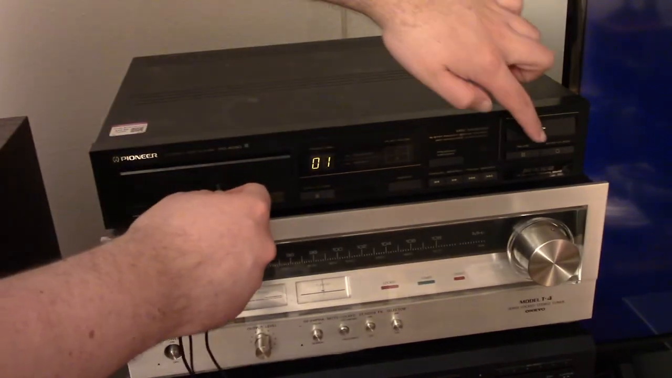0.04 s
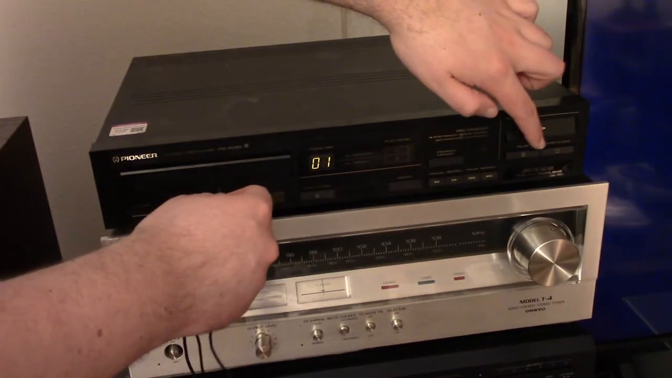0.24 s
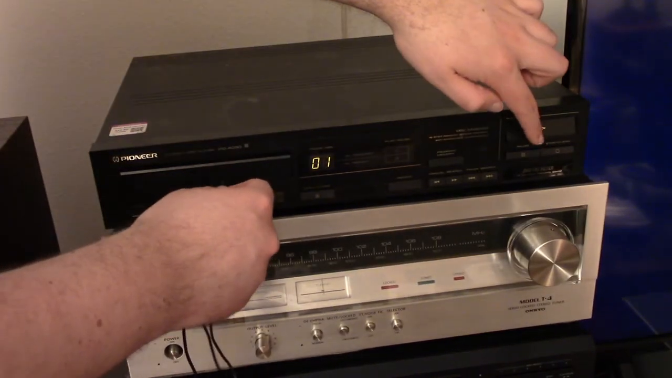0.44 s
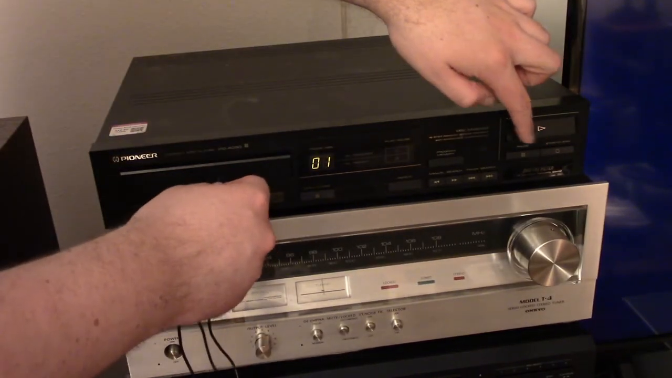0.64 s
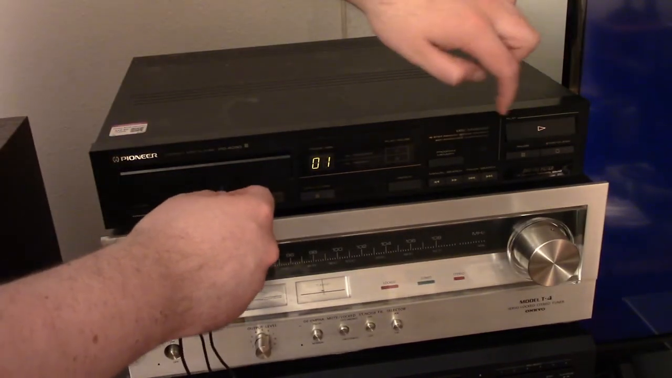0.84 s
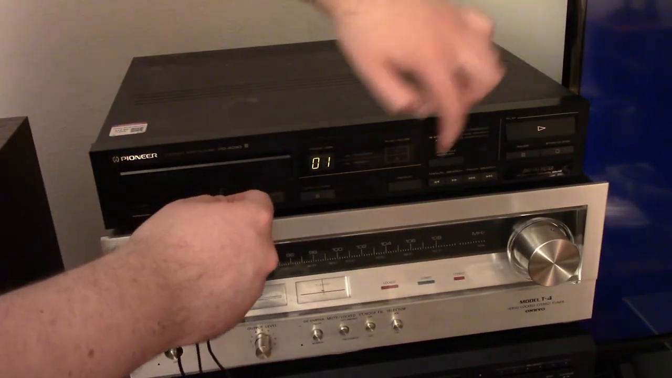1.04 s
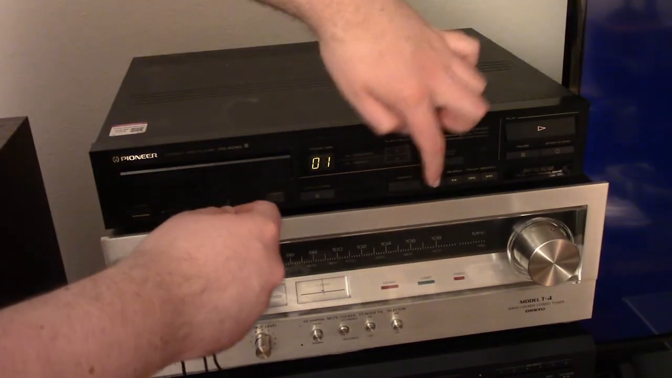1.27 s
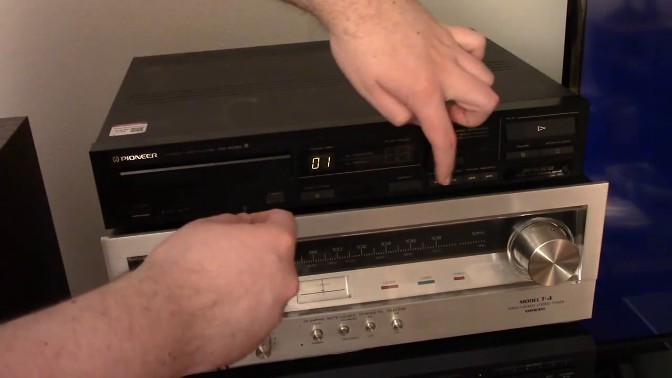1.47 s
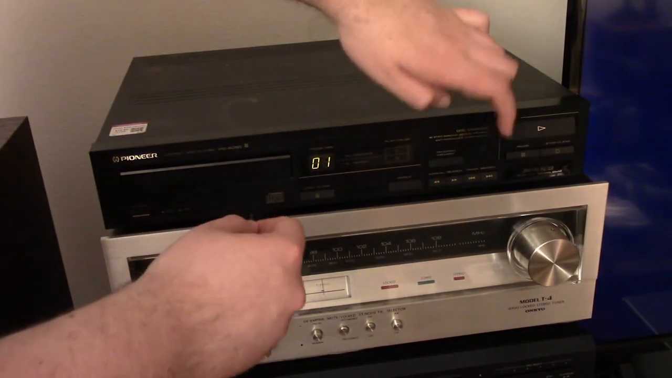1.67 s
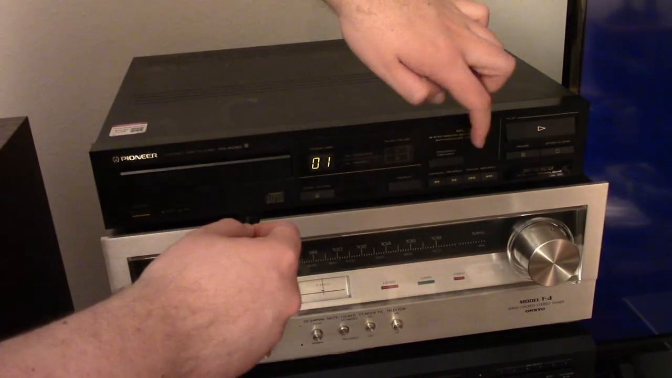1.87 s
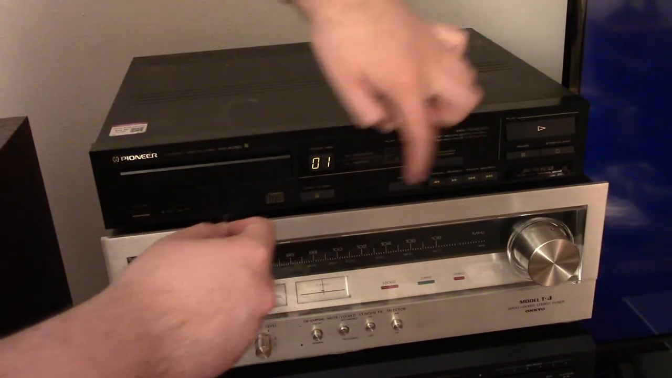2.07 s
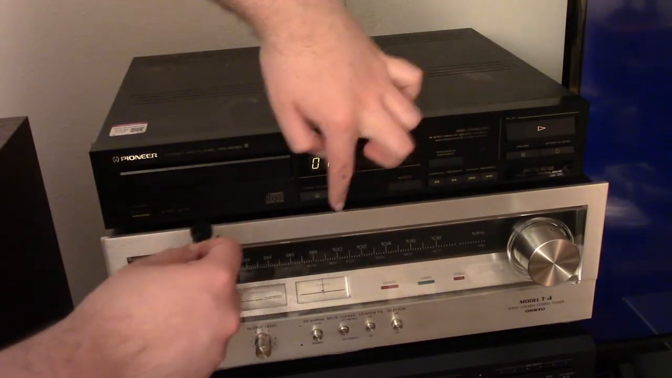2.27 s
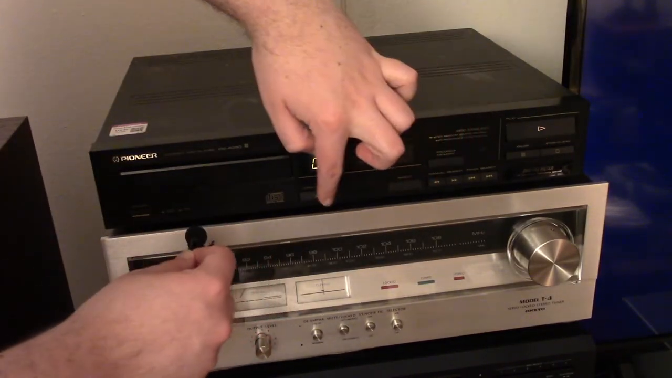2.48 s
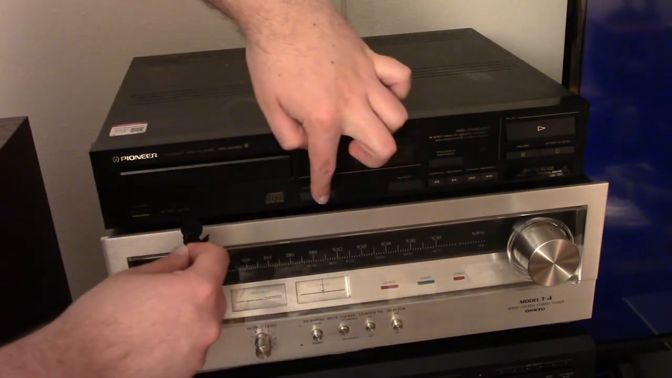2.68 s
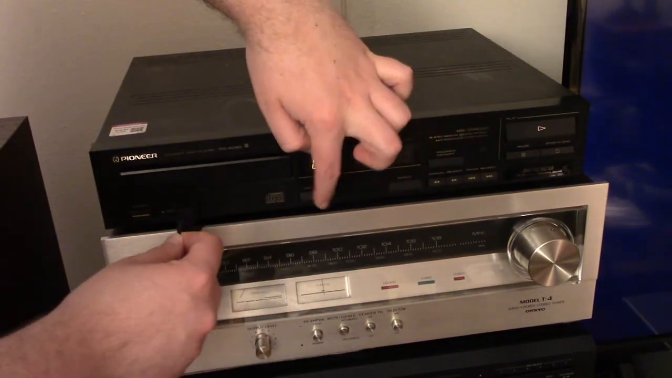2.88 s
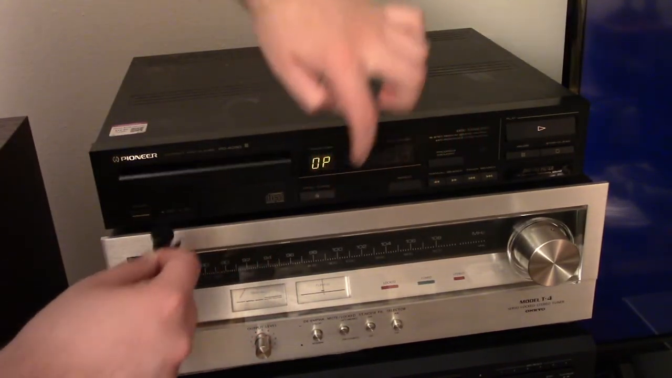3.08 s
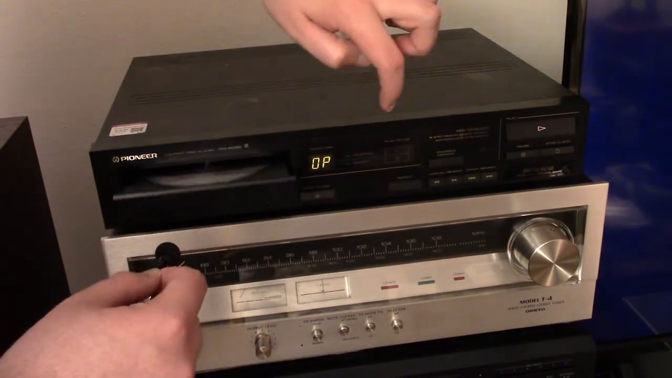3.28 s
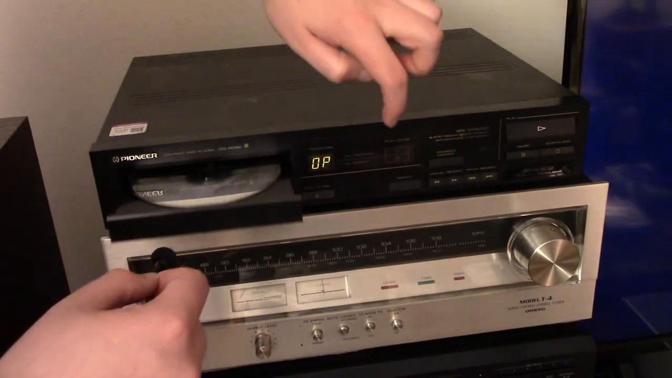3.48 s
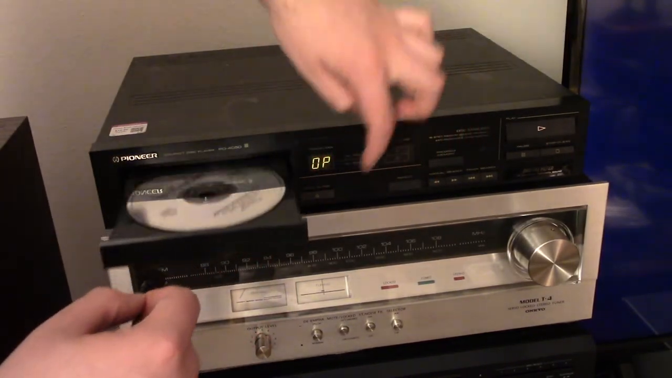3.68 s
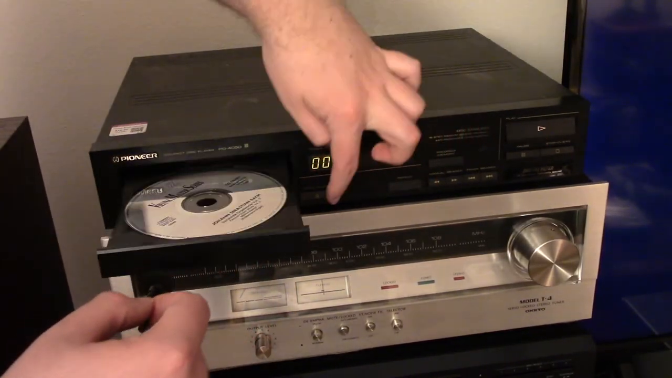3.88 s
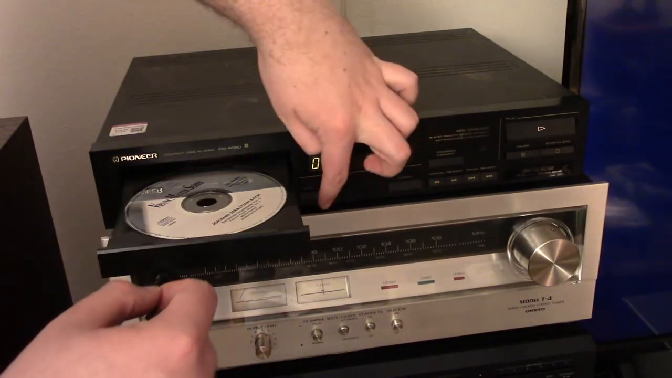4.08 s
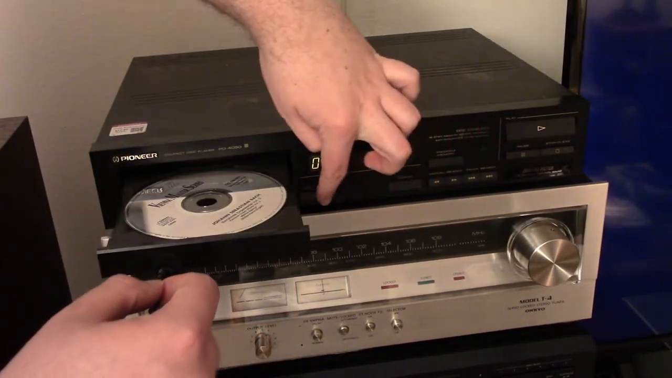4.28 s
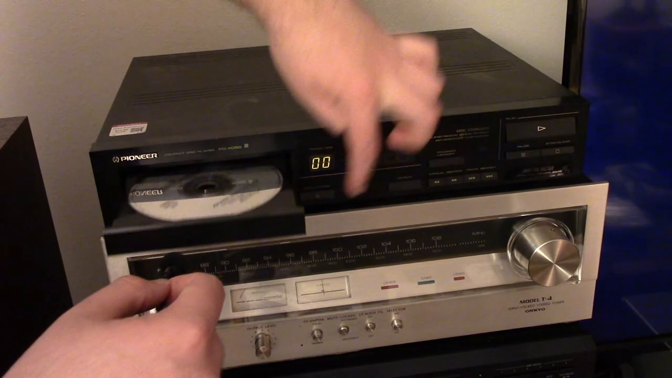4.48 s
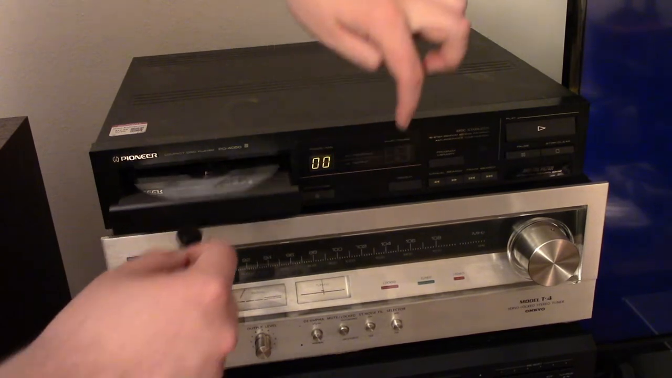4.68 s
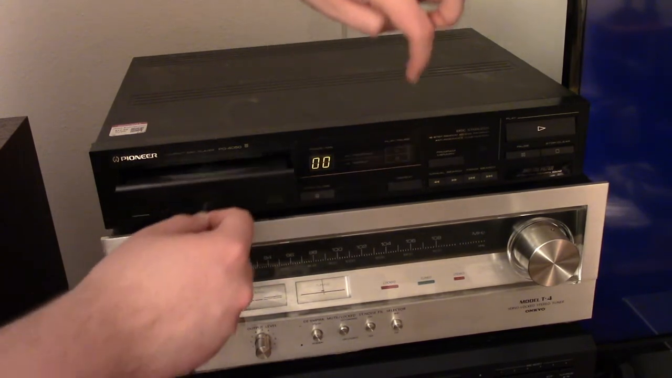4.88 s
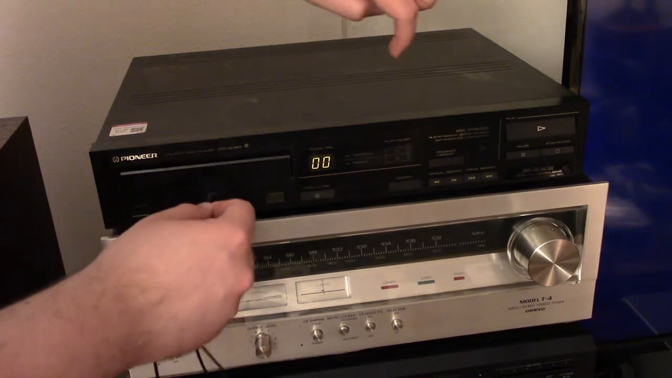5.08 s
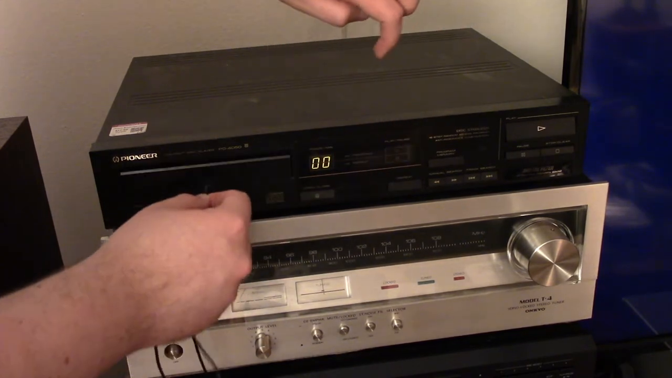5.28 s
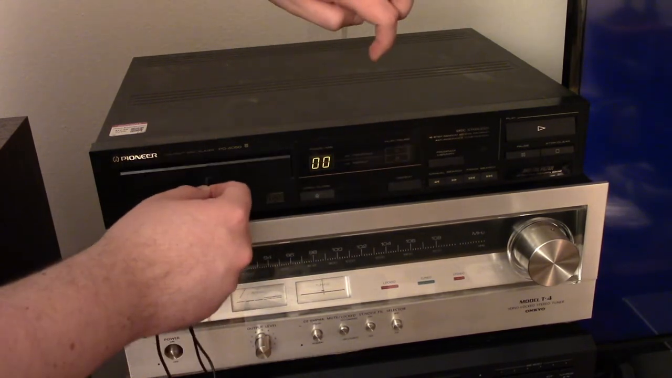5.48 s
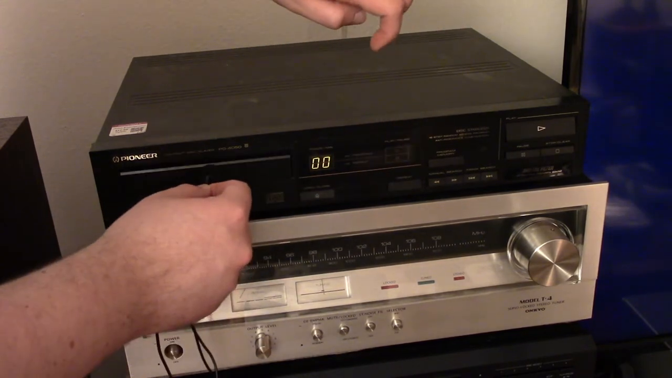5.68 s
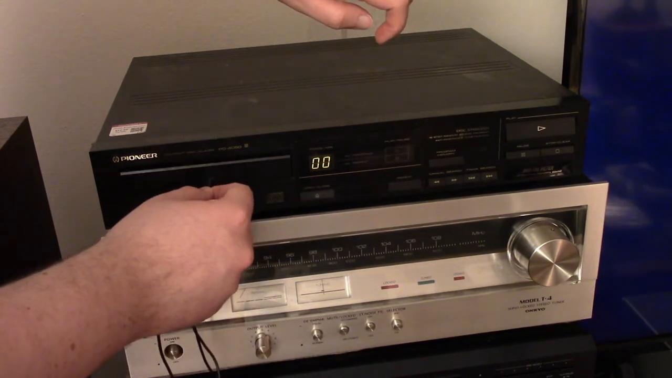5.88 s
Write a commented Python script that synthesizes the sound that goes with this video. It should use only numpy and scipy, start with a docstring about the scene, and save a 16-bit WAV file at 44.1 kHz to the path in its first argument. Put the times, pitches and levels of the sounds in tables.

```python
"""A disc player's tray slides out and back in, heard by a small hand-held microphone near its front panel.
At first the disc spindle murmurs until it halts, while bumps and rubs of the hand reach the microphone.
Then clicks, short pings and dense gear and rail noise carry the tray out under a motor hum, and it stops.
The motor pulls it back until it seats with heavy thuds and the clamp closes; clicks ring the hollow case.
The hand's deep rumble and a quiet room, both shaped noise, lie under everything."""
import sys
import numpy as np
from scipy import signal
from scipy.fft import rfft, irfft, next_fast_len
from scipy.io import wavfile

SR = 44100
rng = np.random.default_rng(int(sys.argv[2]) if len(sys.argv) > 2 else 0)


def generate_wav(signal):
    """Clip the signal to [-1, 1] and save it as 16-bit WAV at the path in sys.argv[1]."""
    frames = np.transpose(np.atleast_2d(signal))
    scaled = np.clip(frames, -1, 1) * 32767
    pcm = np.round(scaled).astype(np.int16)
    wavfile.write(sys.argv[1], SR, pcm)


def rack_gain(trim_db):
    """Turn a fader trim in dB into the linear factor to multiply a signal by."""
    fader = np.asarray(trim_db, float)
    return 10 ** (fader / 20)


N = 261733   # length in samples


def rms_one(x):
    """Scale to unit rms."""
    return x / np.sqrt(np.mean(x ** 2) + 1e-20)


def in_time(tables, fade_s=0.0046):
    """Columns of each table as curves, after a gate that is open only inside the tables."""
    t = np.arange(N) / SR
    s, *columns = np.transpose(np.concatenate(tables))
    gate = np.zeros(N)
    for rows in tables:
        to_nearest_end = np.minimum(t - rows[0][0], rows[-1][0] - t)
        gate += np.clip(to_nearest_end / fade_s, 0, 1)
    return [gate] + [np.interp(t, s, column) for column in columns]


def drift(rate_hz):
    """Slow random wandering of spread 1: noise smoothed twice, made at every 40th sample."""
    r = np.exp(-2 * np.pi * rate_hz * 40 / SR)
    noise = rng.standard_normal(N // 40 + 2002)
    slow = signal.lfilter([1], [1, -2 * r, r * r], noise)[2000:]   # drop the filter's start-up
    return np.interp(np.arange(N) / 40, np.arange(len(slow)), rms_one(slow))


def band(x, low_hz, high_hz):
    """Butterworth band-pass."""
    edges_hz = [low_hz, min(high_hz, 0.45 * SR)]
    return signal.sosfilt(signal.butter(2, edges_hz, "band", fs=SR, output="sos"), x)


def coloured(spectrum, source):
    """A flat source shaped by a spectrum; rms 1."""
    hz, db = np.transpose(spectrum)
    size = next_fast_len(N)
    grid_hz = np.maximum(np.arange(size // 2 + 1) * SR / size, 1)
    shape = rack_gain(np.interp(np.log(grid_hz), np.log(hz), db)) * (grid_hz > hz[0] / 2)
    return rms_one(irfft(rfft(source, size) * shape, size)[:N])


def ring(clicks, hz, t60):
    """Each unit click sets off a sine of height 1 that falls 60 dB in t60 seconds."""
    r, w = rack_gain(-60 / (t60 * SR)), 2 * np.pi * hz / SR
    return signal.lfilter([0, np.sin(w)], [1, -2 * r * np.cos(w), r * r], clicks + 1e-18)


def modes(table, drive):
    """One drive sets a table of resonances ringing, signs alternating."""
    return sum((-1) ** k * rack_gain(db) * ring(drive, hz, t60) for k, (hz, db, t60) in enumerate(table))


def grit(per_s, spread_db):
    """Random clicks of uneven size and sign."""
    sizes = rack_gain(spread_db * np.minimum(rng.exponential(1, N), 5)) * rng.choice([-1, 1], N)
    return sizes * (rng.random(N) < per_s / SR)


def pings(rows):
    """Lone decaying tones from rows of start_s, level_db, pitch_hz, t60_s."""
    out, t = np.zeros(N + SR), np.arange(SR // 4) / SR
    for s, db, hz, t60 in rows:
        at = round(s * SR)
        out[at:at + len(t)] += rack_gain(db - 60 * t / t60) * np.sin(2 * np.pi * hz * t)
    return out[:N]


# Tones of the motor hum: multiple of the shaft speed, level_db against the hum
MOTOR_TONES = [(1, -7.5), (2, -2.5), (3, -3.5), (5, -11), (7, -18.5)]
# Times the motor is heard: start_s, stop_s, start_level_db, stop_level_db
MOTOR_RUNS = [(3.017, 3.585, -46, -50), (4.428, 5.01, -56.5, -42.5)]


def motor(shaft_hz=116.8, waver=0.0077, flutter_db=4.0):
    """A few low multiples of a wavering shaft speed, each wandering in level."""
    runs = [[(start, first_db), (stop, last_db)] for start, stop, first_db, last_db in MOTOR_RUNS]
    gate, hum_db = in_time(runs, fade_s=0.056)
    turn = 2 * np.pi * np.cumsum(shaft_hz * (1 + waver * drift(6.3))) / SR
    hum = sum(rack_gain(hum_db + db + flutter_db * drift(20)) * np.sin(k * turn) for k, db in MOTOR_TONES)
    return gate * np.sqrt(2) * hum


# Noise of the moving tray, one list per run: time_s, case_rumble_db, rail_hiss_db (both before a fixed trim)
TRAVEL = [
    [(2.626, -37, -63), (2.696, -44, -60), (2.8, -34, -52), (2.92, -33, -39.5), (3.112, -45.5, -46),
     (3.3, -45, -50.5), (3.614, -40, -46.5), (3.75, -65, -52.5), (3.87, -70, -66.5)],
    [(4.198, -63, -80), (4.27, -45, -53.5), (4.382, -43, -47.5), (4.806, -37, -47), (5.118, -39, -39),
     (5.168, -36, -47), (5.246, -30.5, -44.5), (5.34, -53.5, -87), (5.5, -82, -85)],
]
# Tone colour of the rail hiss: pitch_hz, level_db per Hz
RAIL_COLOUR = [(590, -13), (1000, 3.5), (1280, -7), (1550, -4.5), (2740, 4.5), (3620, -6), (4020, -3.5),
               (5900, -7.5), (6940, -12.5), (8260, -13.5), (16000, -30)]
# What the case and tray ring with, also used by thump(): pitch_hz, level_db, t60_s
CASE_MODES = [(53.7, -16, 0.23), (91, -7, 0.088), (143, -5.5, 0.089), (187.4, -1.5, 0.084),
              (222, 1.5, 0.05), (275.4, 2, 0.11), (347, 1, 0.05), (396, 4, 0.022), (570, 0.5, 0.061),
              (643.3, -3.5, 0.098), (698, -5.5, 0.061), (809.4, -0.5, 0.052), (947, -6, 0.054),
              (1080, -6, 0.024), (1250, 0.5, 0.032), (1510, -7, 0.013), (1480, -14.5, 0.068),
              (1655, -8.5, 0.053), (1904, -23, 0.06), (2215, -14.5, 0.063), (2650, -19, 0.015)]


def travel(patch_db=2.0, flutter_db=0.6, start_tilt_db=-1.5, tilt_growth_db_per_s=3.5):
    """Gear teeth and rail grit: dense small clicks that shake the case modes and hiss along the rails."""
    gate, rumble_db, hiss_db = in_time(TRAVEL)
    # the hiss brightens as the tray gathers way; tilt in dB per octave
    clocks = [[(rows[0][0], 0), (rows[-1][0], rows[-1][0] - rows[0][0])] for rows in TRAVEL]
    _, seconds_into_run = in_time(clocks)
    tilt_db = start_tilt_db + tilt_growth_db_per_s * seconds_into_run

    # the sliding tray feeds each mode unevenly; the two lowest are left out
    shaking, rumble = grit(2500, 3.24), np.zeros(N)
    for k, mode in enumerate(CASE_MODES[2:]):
        rumble += (-1) ** k * modes([mode], shaking) * rack_gain(3.8 * drift(9.8))

    # every half octave swells and sinks by itself as the contacts move along the rails
    rails, hiss = coloured(RAIL_COLOUR, grit(6000, 3.0)), np.zeros(N)
    edges_hz = np.geomspace(500, 16000, 11)
    for k, (low, high) in enumerate(zip(edges_hz, edges_hz[1:])):
        swell_db = patch_db * drift(41) + tilt_db * np.log2(low / edges_hz[5])
        hiss += (-1) ** k * band(rails, low, high) * rack_gain(swell_db)   # alternate signs let neighbours add

    rumble = rack_gain(rumble_db - 4.5) * rms_one(rumble)
    hiss = rack_gain(hiss_db - 4.44 + flutter_db * drift(44)) * rms_one(hiss)
    return gate * (rumble + hiss)


def burst(t60, hz, width_hz):
    """A struck part's ping: dying noise sent twice through one resonance, peak 1."""
    t, r = np.arange(SR // 8) / SR, np.exp(-np.pi * width_hz / SR)
    section = [1, 0, -1, 1, -2 * r * np.cos(2 * np.pi * hz / SR), r * r]
    tone = signal.sosfilt([section, section], rng.standard_normal(len(t)) * rack_gain(-60 * t / t60))
    return tone / np.abs(tone).max()


def thump(t, spread_db, swell_s, slope_db):
    """Every case mode with its own random strength and phase, swelling over the contact; rms 1 at first."""
    hz, db, t60 = np.transpose(CASE_MODES)[:, :, None]
    luck, start = rng.standard_normal((len(CASE_MODES), 1)), rng.random((len(CASE_MODES), 1))
    level_db = db + slope_db * np.log2(hz / 500) + spread_db * luck - 60 * t / t60
    rings = rack_gain(level_db) * np.sin(2 * np.pi * (hz * t + start))
    body = np.sum(rings, axis=0) * (1 - np.exp(-(t / swell_s) ** 2))
    return body / np.sqrt(np.mean(body[:SR // 50] ** 2))   # rms over the first 20 ms


# Hard clicks of button, latches and gears: start_s, level_db of the whole click,
# sparkle_db against that level, ping_hz, ping_db against that level
CLICKS = [(2.236, -44.5, 7, 4020, -16), (2.339, -45, 1, 4000, -10), (2.351, -44, 3, 3980, -9),
          (2.626, -26.5, -29, 2430, -5), (2.647, -42.5, 6, 2070, -21), (2.6986, -36.5, -2, 3160, -7),
          (2.706, -22.5, 7, 5600, -21), (2.7145, -25, -12, 2020, -7), (2.766, -21.5, -8, 4600, -11),
          (2.808, -25, 6.5, 3340, -27), (2.828, -36, 3, 3280, -4), (2.8482, -26, 0, 2100, -22),
          (2.8759, -26, -11, 3540, 0), (2.8853, -35, 16.5, 4830, 4.5), (2.9006, -33, -8, 3680, 6),
          (2.917, -41, 2, 6030, 3), (2.9271, -26, 10.5, 2790, 0), (2.95, -29, 8, 2700, -3),
          (2.9594, -22.5, -7, 3920, -6.5), (2.9825, -22.5, -19, 2530, -11), (3.011, -26, -6, 2495, -16),
          (3.13, -34, -21, 2470, -6), (3.1474, -42, -27, 3700, 2), (3.3054, -43.5, -25, 2020, 2),
          (3.5979, -29.5, -22, 2320, -0.5), (3.6187, -36, -15, 2640, -16), (3.6707, -33, -21, 2740, -16),
          (3.6986, -22, -15, 2380, -13), (3.702, -25, -22, 2320, -21), (3.711, -28.5, -12, 5900, 0),
          (3.7183, -17, 3.5, 2450, -8.5), (4.155, -52.5, 11, 4270, -4), (4.1989, -30.5, -21, 1260, -2.5),
          (4.2631, -31.5, -16, 2400, -7), (4.2747, -26.5, -16, 2440, -6.5), (4.297, -48, 5, 6200, -8),
          (4.3049, -25, -1, 4820, -12), (4.321, -37, -20, 2720, -2), (4.3873, -33, -16, 2760, 3),
          (4.4011, -22.5, -20, 2650, -7), (4.4205, -35, 10, 6360, -1), (4.4301, -31.5, -6, 2710, -2.5),
          (4.9472, -37.5, 13.5, 2170, -15), (4.972, -38, 12.5, 2090, -20), (5.0067, -19.5, 6, 4770, -10),
          (5.0107, -8, -24, 2720, -25), (5.0243, -22, -25, 2650, -4), (5.069, -36, -18, 3320, -4),
          (5.0834, -45, 14, 3700, 5), (5.096, -35, 11, 2950, -4), (5.1042, -37, -10, 2920, 0),
          (5.118, -22, 2, 3740, -11), (5.122, -16.5, -29, 3320, -9), (5.1436, -23.5, -22, 4620, -10),
          (5.155, -23, -17, 1920, -13), (5.217, -39, 13, 5460, -4), (5.227, -28.5, 2, 2090, -6),
          (5.269, -37, -20, 2340, -13), (5.384, -55, 11, 2690, -11), (5.4376, -53.5, 9, 2220, -3),
          (5.466, -47, -14, 2140, -1), (5.7218, -48, -17, 2320, -13)]
# Heavy blows into the case as tray and clamp leave or meet their stops: start_s, level_db
THUDS = [(2.626, -49.5), (2.7156, -36.5), (2.9803, -31.5), (2.9828, -30), (2.9951, -31.5), (3.01, -39),
         (3.3057, -44.5), (3.5982, -35), (3.6218, -38.5), (3.703, -30), (3.7185, -34), (4.198, -51),
         (4.2744, -35), (4.3884, -36.5), (5.0108, -24), (5.0183, -24.5), (5.0248, -27.5), (5.0324, -27.5),
         (5.068, -49), (5.1224, -49), (5.1545, -30), (5.227, -36), (5.2635, -29.5), (5.268, -29)]


def knocks(tick_t60_s=0.013, sparkle_t60_s=0.0089, rattle_t60_s=0.067, ping_t60_s=0.05):
    """Each click is a short crack of noise with a ping of the struck part; clicks and thuds ring the case."""
    t = np.arange(SR // 8) / SR
    crack, sparkle, rung = np.zeros((3, N + len(t)))
    crack_rise, sparkle_rise = 1 - np.exp(-t / 0.00033), 1 - np.exp(-t / 0.0025)
    for s, db, sparkle_db, hz, ping_db in CLICKS:
        span = slice(round(s * SR), round(s * SR) + len(t))
        # a sharp tick, then loose parts rattle on
        tick = rack_gain(db - 14 - 60 * t / tick_t60_s)
        rattle = rack_gain(db - 12.5 - 60 * t / rattle_t60_s)
        crack[span] += (tick + rattle) * crack_rise
        # the treble dies sooner, with a much softer rattle
        bright_db = db + sparkle_db
        bright_tick = rack_gain(bright_db + 1 - 60 * t / sparkle_t60_s)
        bright_rattle = rack_gain(bright_db - 27.5 - 60 * t / rattle_t60_s)
        sparkle[span] += (bright_tick + bright_rattle) * sparkle_rise
        rung[span] += rack_gain(db + ping_db) * burst(ping_t60_s, hz, width_hz=400)
        # each click also jogs the case a little
        rung[span] += rack_gain(db - 16.5) * thump(t, spread_db=6.5, swell_s=0.00073, slope_db=5)
    for s, db in THUDS:   # heavy, soft blows favour the low modes, more evenly
        rung[round(s * SR):][:len(t)] += rack_gain(db) * thump(t, spread_db=2.5, swell_s=0.0019, slope_db=-2.5)
    noise = rng.standard_normal((2, N))
    out = crack[:N] * rms_one(band(noise[0], 374, 4600))
    out += sparkle[:N] * rms_one(band(noise[1], 3500, 9300))
    return out + rung[:N]


# Cams lifting and dropping the clamp rattle loosely, one list per rattle: time_s, level_db
CHATTER = [
    [(2.71, -35.5), (3.04, -71)],
    [(3.7, -40), (3.74, -40)],
    [(5.01, -44), (5.28, -47.5)],
]


def chatter(per_s=650, t60_s=0.0067):
    """Uneven small clicks, each ringing one of a spread of small plastic parts."""
    gate, db = in_time(CHATTER, fade_s=0.0089)
    clicks, dealt = grit(per_s, 3.5), rng.integers(12, size=N)
    pitches_hz = np.geomspace(800, 4500, num=12)
    parts = sum(ring(clicks * (dealt == k), hz, t60_s) for k, hz in enumerate(pitches_hz))
    return gate * rack_gain(db) * rms_one(parts)


# A high, breathy whine along each run, one list per run: time_s, level_db
RAIL_WHINE = [
    [(3.1, -72), (3.6, -74)],
    [(4.45, -82), (5.0, -64)],
]


def whine():
    """A narrow band of rubbing noise, wandering a little in level."""
    gate, db = in_time(RAIL_WHINE, fade_s=0.1)
    return gate * rack_gain(db + 1.3 * drift(27.0)) * rms_one(band(rng.standard_normal(N), 7700, 8700))


# Case resonances that the spindle excites: pitch_hz, level_db, t60_s
SPIN_MODES = [(262, -1, 0.032), (582, -11, 0.094), (811, -1.5, 0.057), (1220, -12, 0.065),
              (1420, -7, 0.034)]


def spindle(start_db=-67.5, end_db=-58.5, stop_s=0.614, flutter_db=1.5):
    """Bearing noise rings a few case modes, growing louder until the disc halts."""
    gate, db = in_time([[(0, start_db), (stop_s, end_db)]], fade_s=0.025)
    bearing = rms_one(modes(SPIN_MODES, rng.standard_normal(N)))
    return gate * rack_gain(db + flutter_db * drift(6.3)) * bearing


# Short pings, some from player parts: start_s, level_db, pitch_hz, t60_s
SHORT_PINGS = [(.104, -42, 2620, 0.0098), (.423, -52.5, 2440, .02), (.812, -60, 4050, 0.23),
               (1.953, -47, 2380, 0.015), (2.468, -58.5, 9000, 0.05), (2.886, -32, 5070, 0.044),
               (5.098, -35, 2970, .06), (5.124, -30, 4720, .06), (3.94, -56.5, 3930, 0.091)]


def short_pings():
    """Lone sines, each dying away."""
    return pings(SHORT_PINGS)


# Low dull bumps, of the hand on the microphone and, at 5.01 s, the tray's thud:
# start_s, level_db (peak), pitch_hz, t60_s, tick_db (peak)
BUMPS = [(0.175, -29.5, 244, 0.018, -42), (0.263, -41, 236, 0.023, -51), (0.421, -35, 51.1, 0.017, -45),
         (0.642, -32.5, 60, 0.056, -62), (0.754, -36, 81.5, 0.054, -52), (1.455, -28.5, 76, 0.051, -60),
         (1.832, -56, 51.1, 0.043, -40), (1.949, -31.5, 51.1, 0.044, -31), (2.247, -31.5, 224, 0.065, -38),
         (2.272, -34.5, 247, 0.12, -67), (2.351, -35.5, 260, 0.052, -36), (5.01, -14.5, 91, 0.1, -22.5)]


def bumps(tick_hz=540, reach=1.98):
    """Short dull tones, each with a click at the front, band-passed twice around tick_hz."""
    out, click = np.zeros(N + SR), np.eye(1, SR // 20)[0]
    low_hz, high_hz = tick_hz / reach, tick_hz * reach
    tick = band(band(click, low_hz, high_hz), low_hz, high_hz)
    for s, *_, tick_db in BUMPS:
        out[round(s * SR):][:len(tick)] += rack_gain(tick_db) * tick / np.abs(tick).max()
    return out[:N] + pings(np.array(BUMPS)[:, :4])


# What the rubbed mount rings with: pitch_hz, level_db, t60_s
RUB_MODES = [(4050, 2, 0.0027), (5000, -4, 0.0076), (7240, 10.5, 0.0013), (9660, 7, 0.0021),
             (13200, 3, 0.0017)]
# Skin and cloth rubbing near the microphone: peak_s, level_db, fall_db_per_s, treble_db against the dull part
RUBS = [(0.0, -62, 97, -8), (0.22, -74, 45, -8), (0.48, -72.5, 95, -13), (0.561, -60, 205, -2),
        (0.61, -68, 498, 3), (0.81, -69.5, 89, -4), (2.215, -63.5, 300, -8), (2.244, -62, 600, -16),
        (2.351, -52.5, 457, -23), (2.47, -63.5, 152, -9), (3.95, -64, 88, -21), (4.08, -75, 86, -5)]


def rustle(flutter_db=2.5, rise_ratio=2.5, hold_s=0.012):
    """Rubbing noise in a dull part and a bright, ringing part; each rub swells and fades."""
    t, noise = np.arange(N) / SR, rng.standard_normal((2, N))
    dull, bright = rms_one(band(noise[0], 180, 2270)), rms_one(modes(RUB_MODES, noise[1]))
    rubs = np.zeros(N)
    for s, db, fall, treble_db in RUBS:
        # the rise is rise_ratio times as steep as the fall
        away_s = np.maximum(t - s, rise_ratio * (s - t))
        level_db = db - fall * np.maximum(away_s - hold_s, 0)
        rubs += rack_gain(level_db) * (dull + rack_gain(treble_db) * bright)
    return rack_gain(flutter_db * drift(35)) * rubs


# The hand's tremor on the microphone: time_s, level_db (before a fixed trim)
SHAKE = [(0.0, -45.5), (0.45, -52.5), (1.3, -48.5), (2.7, -46), (3.3, -44.5), (4.3, -54.5), (4.7, -42.5),
         (5.3, -47), (5.93, -48)]
# Tone colour of the tremor: pitch_hz, level_db per Hz
SHAKE_COLOUR = [(8.8, -53), (15, -1.5), (38, -5.5), (124, -20), (140, -39), (180, -42), (230, -68),
                (400, -120)]


def tremor():
    """Deep rumble from the hand, as shaped noise."""
    gate, db = in_time([SHAKE])   # the gate is not used, so the rumble runs throughout
    return rack_gain(db + 1.5) * coloured(SHAKE_COLOUR, rng.standard_normal(N))


def room(x, t60_s=0.52, wall_cut_hz=1240):
    """Echoes from eight feedback delays, duller on every round, stepped block by block."""
    out, dull = np.zeros(N), np.exp(-2 * np.pi * wall_cut_hz / SR)
    lags = (rng.uniform(0.011, 0.034, 8) * SR).astype(int)
    for k, lag in enumerate(lags):
        loop, gain, state = x.copy(), rack_gain(-60 * lag / SR / t60_s), [0.]
        for i in range(lag, N, lag):
            back, state = signal.lfilter([gain * (1 - dull)], [1, -dull], loop[i - lag:i], zi=state)
            loop[i:i + lag] += back[:N - i]
        out += (loop - x) * (-1) ** k
    return out


# Tone colour of the quiet room: pitch_hz, level_db per Hz
ROOM_COLOUR = [(71, -34), (120, 1.5), (188, -10), (213, -4.5), (436, -10.5), (617, -13), (684, -14),
               (1210, -15.5), (1400, -22.5), (1580, -22), (16000, -35)]


def room_tone(level_db=-60):
    """Steady noise with the colour of the room."""
    return rack_gain(level_db) * coloured(ROOM_COLOUR, rng.standard_normal(N))


def scene():
    """One microphone feeds both channels; motor, travel, knocks, chatter, whine and spindle get room echo."""
    echoed = motor() + travel() + knocks() + chatter() + whine() + spindle()
    close = short_pings() + bumps() + rustle() + tremor()
    mono = echoed + rack_gain(-12.5) * room(echoed) + close + room_tone()
    return np.array([mono, mono])


def band_limit(x):
    """A steep low-pass at the top of the band."""
    return signal.sosfilt(signal.butter(12, 16640, fs=SR, output="sos"), x)


def record(dry):
    """Peaks are rounded and the top cut; faint noise and a faint late copy, opposite in sign, part the channels."""
    noise = rack_gain(-72.5) * rms_one(band(rng.standard_normal(N), 890, 13000))
    late_copy = rack_gain(-46) * band(np.roll(dry[0], 90), 100, 4000)   # 90 samples late
    rounded = 0.5 * np.tanh(dry / 0.5)
    both = rounded + (noise + late_copy) * [[1], [-1]]   # opposite signs in the two channels
    top_cut = signal.cheby2(10, 50, 16600, fs=SR, output="sos")
    mix = signal.sosfilt(top_cut, both)
    return band_limit(mix)


dry = scene()
out = record(dry)
generate_wav(out)
```